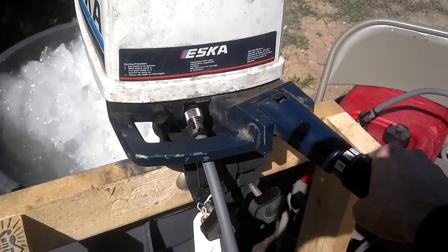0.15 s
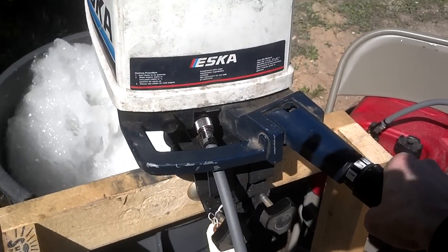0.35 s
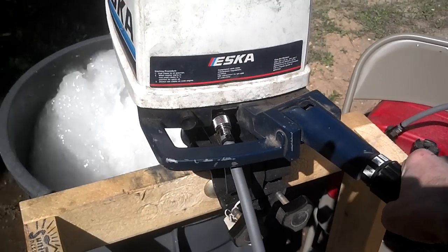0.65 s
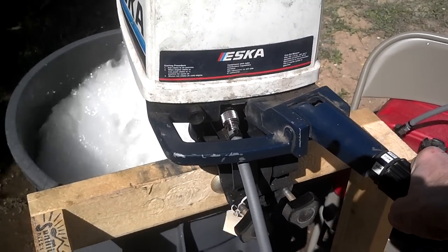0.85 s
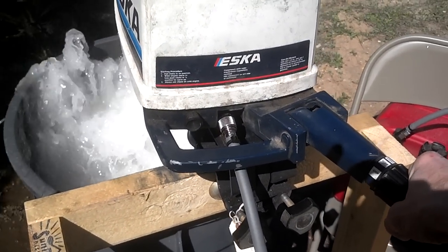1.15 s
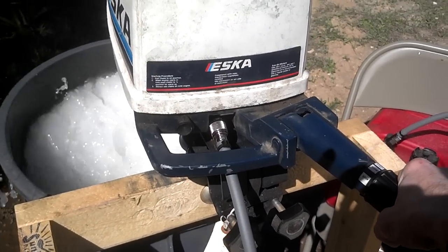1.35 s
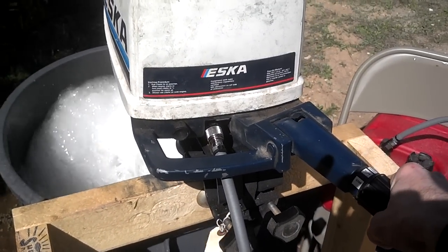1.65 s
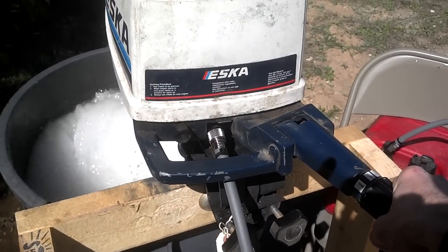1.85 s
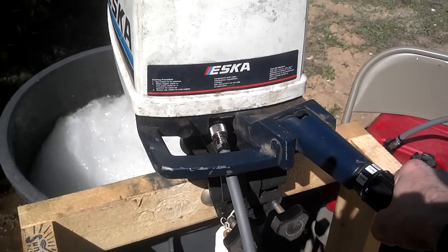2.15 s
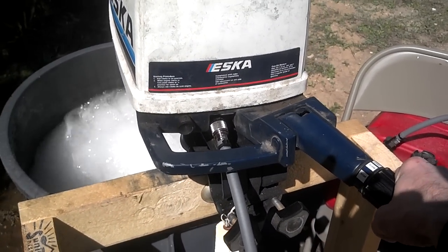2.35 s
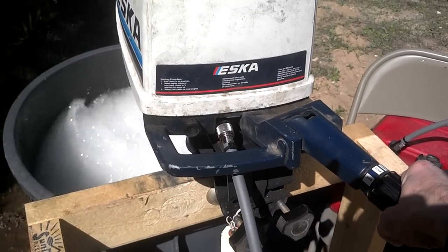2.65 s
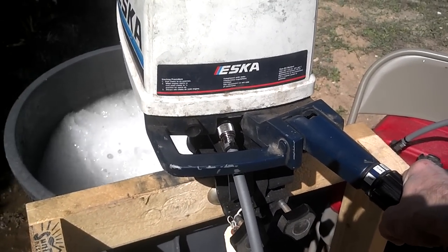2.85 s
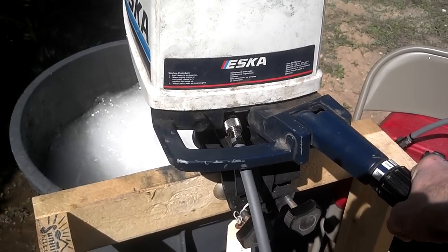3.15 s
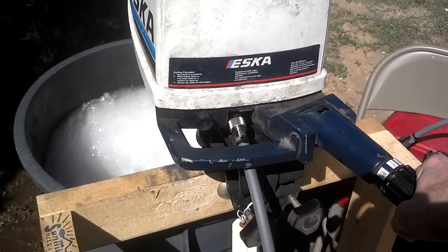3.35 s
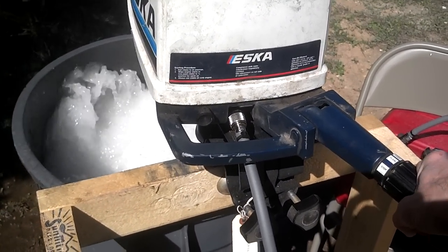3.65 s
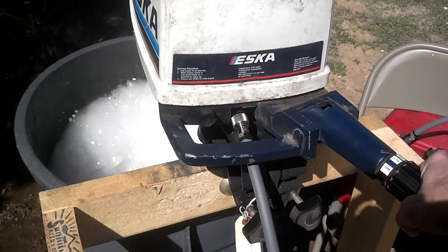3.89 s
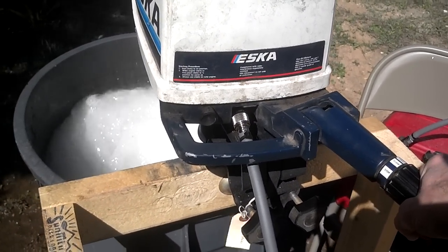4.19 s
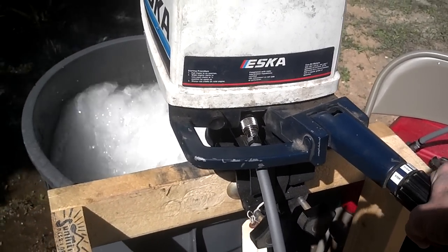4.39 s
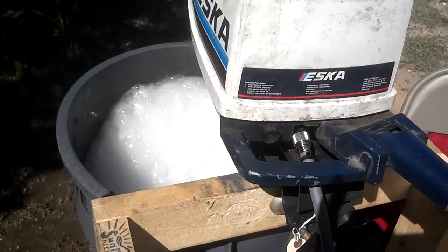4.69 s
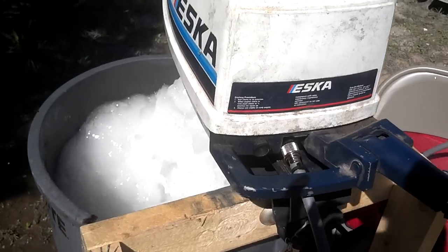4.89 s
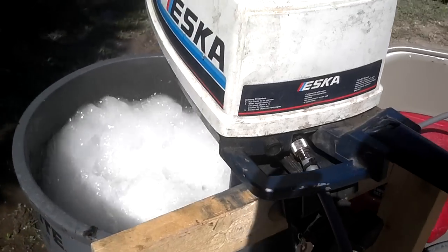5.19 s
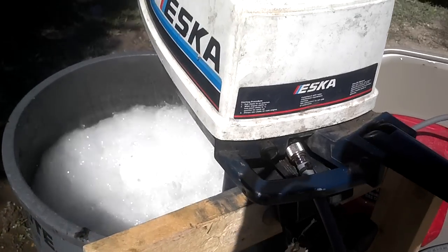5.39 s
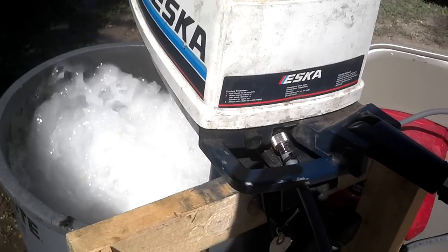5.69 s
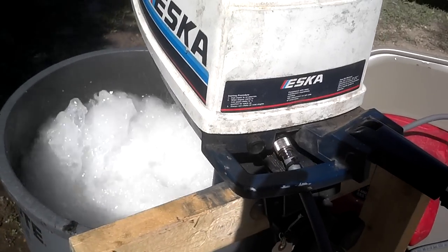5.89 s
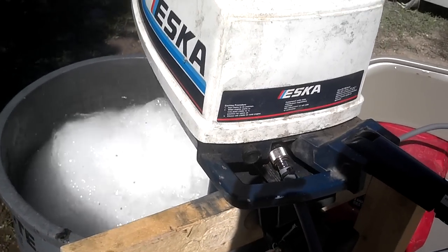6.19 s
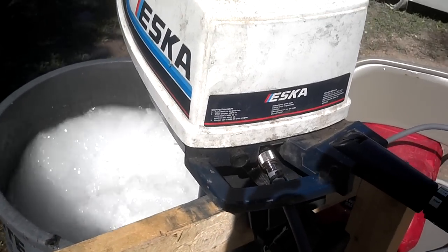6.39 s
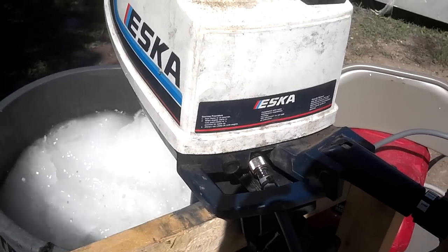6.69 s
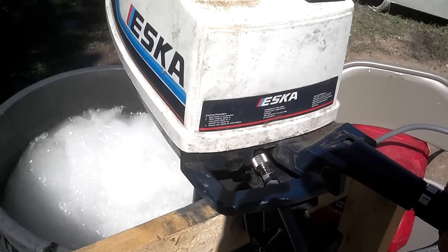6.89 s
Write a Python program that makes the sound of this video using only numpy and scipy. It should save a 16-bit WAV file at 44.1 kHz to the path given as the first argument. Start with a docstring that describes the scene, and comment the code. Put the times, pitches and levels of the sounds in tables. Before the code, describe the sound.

A small one-cylinder two-stroke outboard motor runs on a stand with its propeller in a tub of water. It starts at a fast, clattering idle and slows within two seconds to a steady putter, each firing a hollow knock with a light metallic tick. Water churns underneath throughout, and puffs of exhaust and spray hiss more toward the end. The microphone is close, in wide stereo.

```python
"""The fast idle of a small one-cylinder two-stroke outboard, close by, slowing to a steady putter.
It runs on a stand with its propeller churning a tub of water. Each firing thumps in the leg and cowl,
barks in the intake, ticks, and puffs out gas and spray; the stand hums, the fan whirrs, the fins ring.
A two-port microphone close to the motor hears all this in a wide stereo image."""
import sys
import numpy as np
from scipy import signal
from scipy.fft import rfft, irfft
from scipy.io import wavfile
from scipy.ndimage import uniform_filter1d

SR = 44100
rng = np.random.default_rng(int(sys.argv[2]) if len(sys.argv) > 2 else 0)


def master_out(mix):
    """Clip the mix to full scale and print it as 16-bit PCM to the path in sys.argv[1]."""
    frames = np.transpose(np.atleast_2d(mix))
    ceiling = np.clip(frames, -1, 1)
    pcm = np.round(ceiling * 32767).astype(np.int16)
    wavfile.write(sys.argv[1], SR, pcm)


N = 310464
TIME, FREQS = np.arange(N) / SR, np.fft.rfftfreq(N, 1 / SR)
IDLE_HZ = 38.8  # crank turns per second at the steady putter

# strength of the firings: (time [s], intake bark [dB], leg thump [dB], cowl knock [dB])
FIRING_LEVELS = [(0, -26.5, -33, -39), (.3, -28.5, -28.5, -34), (.62, -26, -32.5, -30.5),
                 (.95, -28, -28.5, -35), (1.12, -29, -29, -37), (1.4, -27.5, -29, -38),
                 (1.54, -36.5, -29, -32.5), (2.19, -27.5, -22.5, -27.5), (2.25, -35.5, -24.5, -31.5),
                 (2.45, -24.5, -21.5, -26), (2.62, -33.5, -25, -31.5), (2.9, -26, -24.5, -29),
                 (3.13, -27, -25.5, -33), (3.2, -33.5, -36, -34), (3.42, -30, -25, -28.5),
                 (4.0, -28.5, -27.5, -30.5), (4.53, -26, -27, -26), (4.82, -25.5, -25.5, -25.5),
                 (4.9, -29, -29.5, -33), (5.44, -25, -25, -34), (5.54, -35.5, -26, -31.5),
                 (5.9, -31.5, -24, -28.5), (6.1, -29, -27.5, -33), (6.44, -28, -27.5, -28.5),
                 (6.6, -29.5, -26, -28.5), (7.04, -31, -25.5, -33.5)]
# the motor's colour; the throttle closes near 1.45 s, the microphone swings to the tub near 4.9 s:
# (time [s], side panel [dB], intake pitch [Hz], tick [dB], upper hiss of the puff [dB])
TIMBRE = [(0, -33, 1120, -48.5, -59), (.5, -40, 1135, -41, -58), (.85, -33, 1150, -44.5, -62),
          (1.02, -35, 1120, -45, -60), (1.17, -41, 1160, -37.5, -62), (1.43, -32, 1114, -40, -59),
          (1.5, -40, 1140, -57, -62), (1.65, -32, 1070, -45, -62), (2.7, -28.5, 1082, -46.5, -48.5),
          (3.6, -25.5, 1097, -44, -51), (4.2, -28.5, 1100, -44, -53), (4.47, -26, 1074, -45.5, -48),
          (4.76, -29, 1107, -48, -46), (4.88, -29.5, 1085, -66, -50), (5.2, -28, 1083, -51, -47),
          (5.5, -30, 1110, -59, -41), (5.9, -24.5, 1150, -52, -42.5), (6.3, -26, 1104, -58, -43),
          (7.04, -28.5, 1065, -57, -48)]
# sounds strongest at speed: (time [s], upper intake tone [dB], low clatter [dB], high clatter [dB])
AT_SPEED = [(0, -39, -29, -31.5), (.35, -35, -34, -39), (.55, -29, -33, -34), (.72, -38, -27, -40),
            (.9, -29, -39, -42), (1.05, -30, -35, -32), (1.15, -32, -37, -25.5), (1.3, -42, -31.5, -36.5),
            (1.5, -35.5, -38.5, -38), (1.8, -52, -58, -62), (2.7, -39.5, -47, -40.5), (4, -50, -40, -48),
            (5.6, -55, -42, -48), (7.04, -63, -55, -48)]


def gain_of(db):
    """Decibels to gain."""
    return 10 ** (np.asarray(db) / 20)


def unit_rms(x):
    """Scales to rms 1."""
    return x / np.sqrt(np.mean(x ** 2) + 1e-20)


def at(rows, seconds, column=1):
    """One column of a time table at the given seconds."""
    return np.interp(seconds, np.transpose(rows)[0], np.transpose(rows)[column])


def fader(rows, column=1):
    """A time table's dB column as a gain at every sample."""
    return gain_of(at(rows, TIME, column))


def at_hz(points, hz=FREQS):
    """Reads a table on a log-frequency axis."""
    f, value = np.transpose(points)
    return np.interp(np.log(hz + 1), np.log(f + 1), value)


def coloured(x, gains):
    """Shapes a signal with one gain per frequency, to rms 1."""
    return unit_rms(irfft(rfft(x) * gains, N))


def noise(spectrum, envelope):
    """Two unrelated noises of one colour under one envelope, at rms 1."""
    return unit_rms(envelope * coloured(rng.standard_normal((2, N)), gain_of(at_hz(spectrum))))


def bump(t, rise_s, fall_s):
    """Envelope that swells and falls exponentially around a rounded top."""
    return 1 / (np.exp(-t / rise_s) + np.exp(np.minimum(t / fall_s, 50)))


def strike(moments, shape, spread_db, jitter_s):
    """Lays shape(seconds since the blow) at every moment, uneven in strength and timing."""
    strength, shift, drift = rng.standard_normal((len(moments), 3, 1)).transpose(1, 0, 2)
    drift = unit_rms(uniform_filter1d(drift, size=5, axis=0))  # slow, over some five firings
    strength = np.clip(strength + .7 * drift, -3, 3)
    samples = np.round(moments * SR).astype(int)[:, None] + np.arange(-500, 3500)
    blows = gain_of(spread_db * strength) * shape(samples / SR - moments[:, None] - jitter_s * shift)
    inside = (samples >= 0) & (samples < N)
    return np.bincount(samples[inside], blows[inside], N)


def ring(moments, modes, spread_db, rise_s=.0003, detune=.007, pitch=1):
    """Each blow rings a set of modes, each with its own strength and a little off pitch."""
    def mode(hz, db, t60):
        hz = hz * pitch * (1 + detune * rng.standard_normal((len(moments), 1)))
        return lambda t: (-gain_of(db - 60 * t / t60) * np.sin(2 * np.pi * hz * t)
                          * (1 - np.exp(-np.maximum(t, 0) / rise_s)))
    return unit_rms(sum(strike(moments, mode(*row), spread_db, jitter_s=.00006) for row in modes))


def gate(moments, rise_s, fall_s, spread_db):
    """An envelope that opens briefly at each moment."""
    return strike(moments, lambda t: bump(t, rise_s, fall_s), spread_db, jitter_s=.0003)


def waver(depth_db=2, smooth_s=.08):
    """A gain that wanders slowly by chance."""
    slow = uniform_filter1d(rng.standard_normal(N), size=round(smooth_s * SR))
    return gain_of(depth_db * unit_rms(uniform_filter1d(slow, size=round(smooth_s * SR / 2))))


def thump(firings, above_idle_hz):
    """The blow-down knocks side panel, cowl and exhaust housing, then thumps the leg."""
    # ringing modes: (frequency [Hz], relative level [dB], t60 [s])
    leg_modes = [(199.4, -7, 0.058), (229.6, -0.5, 0.093), (266.4, -3, 0.087), (282.4, 0.5, 0.1),
                 (356, -14.5, 0.019)]  # leg and tub wall
    cowl_modes = [(426.4, 10, 0.076), (596, 2, 0.045), (708, 1.5, 0.071), (875, -2, 0.06),
                  (1588, 0.5, 0.061), (1850, -14, 0.018)]
    housing_modes = [
        [(541, 7.5, 0.14), (626, 9.5, 0.095)],
        [(734.4, 1, 0.084), (807, -12, 0.13)],
    ]  # a low set and a high set
    panel_modes = [(486.6, 11.5, 0.041), (515.4, -6, 0.087)]
    # the panel's hollow ring moves with the water level: (time [s], pitch [ratio])
    panel_pitch = [(0, 1.016), (4.9, 0.86), (5.05, 1.04), (5.3, 1), (5.37, 0.94), (5.42, 0.87), (5.58, .86),
                   (5.68, 0.94), (5.92, 1), (6.05, 0.94), (6.15, 0.92), (7.04, 0.98)]
    blows = firings - .0001 - .00013 * above_idle_hz  # earlier at speed
    burble = np.interp(firings, TIME, waver())[:, None] ** .06  # the pitch wavers slightly at random
    leg = ring(blows + .0006, leg_modes, spread_db=1.6, rise_s=.0016, detune=.014, pitch=burble)
    cowl = ring(blows, cowl_modes, spread_db=1.5)
    dull, bright = (ring(blows, modes, spread_db=2.5, detune=.016) for modes in housing_modes)
    panel = ring(blows - .0008, panel_modes, spread_db=1.6, pitch=at(panel_pitch, firings)[:, None])
    clatter = fader(AT_SPEED, column=2) * dull + fader(AT_SPEED, column=3) * bright
    knock = fader(FIRING_LEVELS, column=3) * cowl + fader(TIMBRE, column=1) * panel
    return fader(FIRING_LEVELS, column=2) * leg + knock + clatter


def intake_bark(firings):
    """Two intake tones swell for a few cycles, are cut as the port shuts and ring on faintly."""
    def swell(t):
        return bump(t, rise_s=.0017, fall_s=.001) + gain_of(-16.5) * bump(t, rise_s=.0017, fall_s=.0037)

    def tone(peaks, hz):
        hz = hz * (1 + .003 * rng.standard_normal((len(peaks), 1)))
        barks = strike(peaks, lambda t: -swell(t) * np.cos(2 * np.pi * hz * t),
                       spread_db=.9, jitter_s=.00004)
        return unit_rms(barks)
    peaks = firings + .0003
    lower = tone(peaks, hz=at(TIMBRE, firings, column=2)[:, None])
    upper = tone(peaks - .00057, hz=1318)
    return fader(FIRING_LEVELS, column=1) * lower + fader(AT_SPEED, column=1) * upper


def stand_hum(turns, speed_hz):
    """Shaft orders shake the stand, loudest where they cross its resonances."""
    # the stand's response: (frequency [Hz], level [dB])
    response = [(80, -63), (112, -43.5), (150, -64), (190, -42), (222, -32), (250, -49), (285, -36),
                (312, -32.5), (335, -41)]
    # the third, fourth and sixth orders come and go: (time [s], lift [dB])
    third = [(2.4, -5), (3.5, 4)]
    fourth = [(0, 8.5), (.2, 6), (.26, -8), (.32, 10), (.48, 3), (.6, -21), (.8, 10), (.95, 6), (1.05, 9),
              (1.2, 14), (1.3, -23), (7.04, 0)]
    sixth = [(0, -3), (.15, -9), (.24, 6), (.32, -6), (.48, -1), (.55, 5), (.65, 4.5), (.8, 4.5),
             (.88, -0.5), (1.1, 3), (1.6, -22), (3, -11), (4.8, 4.5), (5.6, 7.5), (7.04, -3)]

    def partial(order, trim_db, db_per_hz, lift_db=0):
        db = trim_db + db_per_hz * (speed_hz - IDLE_HZ) + lift_db + at_hz(response, order * speed_hz)
        return gain_of(db) * waver() * np.sqrt(2) * np.sin(2 * np.pi * order * turns)
    return (partial(2, trim_db=-.5, db_per_hz=.33)
            + partial(3, trim_db=-1.5, db_per_hz=.32, lift_db=at(third, TIME))
            + partial(4, trim_db=-9.5, db_per_hz=.53, lift_db=at(fourth, TIME))
            + partial(6, trim_db=-4, db_per_hz=.55, lift_db=at(sixth, TIME)))


def metal_tick(firings):
    """A bright tick at each firing: a short hiss and a hard click of the same colour."""
    # the tick's colour: (frequency [Hz], relative level [dB])
    spectrum = [(2500, -32), (3500, 1), (5000, -1), (6800, 15.5), (7500, 11), (8400, 18), (9500, 6),
                (12000, 5), (13500, -15), (15000, -4)]
    # its timing against the firing: (time [s], lag [s])
    lag = [(0, .0016), (.55, .0017), (.8, .0004), (1.1, -.0002), (1.4, -.0008), (1.7, .0002), (4.1, -.0001),
           (4.6, -.001), (7.04, -.0005)]
    ticks = firings + at(lag, firings)
    hiss = noise(spectrum, gate(ticks, rise_s=.0003, fall_s=.0007, spread_db=1.4))
    clicks = strike(ticks, lambda t: np.exp(-(t / .00002) ** 2), spread_db=1, jitter_s=.0002)
    snap = coloured(clicks, gain_of(at_hz(spectrum)))
    return fader(TIMBRE, column=3) * unit_rms(hiss + .8 * snap)


def piston_slap(firings):
    """The piston slaps just after each firing: a short crack of noise."""
    # the slap's colour: (frequency [Hz], relative level [dB])
    spectrum = [(1100, -30), (1450, 5), (1900, 0.5), (2300, -9.5), (3000, -22), (3700, -6.5), (4500, -26)]
    # its strength: (time [s], level [dB])
    levels = [(0, -53), (.5, -33), (.9, -42), (1.15, -38.5), (1.42, -45), (1.55, -45), (2.8, -42),
              (3.8, -56), (4.6, -52), (5.5, -55), (6.5, -46), (7.04, -48)]
    return fader(levels) * noise(spectrum, gate(firings + .0006, rise_s=.0004, fall_s=.001, spread_db=1.5))


def exhaust_puff(firings):
    """Gas and spray hiss out after each firing, louder when water surges over the exhaust."""
    # the puff's lower and upper hiss, and the spray: (frequency [Hz], relative level [dB])
    puff_spectra = [
        [(4000, -30), (6500, 0), (9000, 6), (10000, -15)],
        [(9000, -2), (10500, 4), (11800, 9), (12800, 5), (13600, -12)],
    ]
    spray_spectrum = [(12500, -32), (14000, -6), (15200, 5), (17000, -4)]
    # lower hiss and spray between surges: (time [s], level [dB])
    lower_levels = [(0, -58), (1.5, -64), (2.7, -54), (4.3, -61), (4.7, -58), (4.9, -49), (5.6, -47.5),
                    (6.5, -48.5), (7.04, -60)]
    spray_levels = [(0, -52), (.8, -55), (1.3, -54), (1.6, -52), (2.5, -50), (3.5, -50), (4.4, -49),
                    (4.9, -47), (5.3, -40), (6, -40), (6.5, -39), (7.04, -44)]
    # water surges: (time [s], lift [dB])
    surges = [(2.11, 10), (2.55, 5), (2.76, 6), (3.9, 5), (4.35, 1), (5.36, 0), (5.62, 2.5), (6.2, 1),
              (6.52, 1), (6.94, 5)]
    lower, upper, spit = (noise(band, gate(firings + .0017, rise_s=.0007, fall_s=.0032, spread_db=3.4))
                          for band in (*puff_spectra, spray_spectrum))
    surge_db = sum(2 * db * bump(np.maximum(TIME - s, -1), rise_s=.013, fall_s=.039) for s, db in surges)
    puff = fader(lower_levels) * lower + fader(TIMBRE, column=4) * upper
    spray = fader(spray_levels) * waver() * spit
    return gain_of(surge_db) * (puff + spray)


def cowl_buzz(throb, above_idle_hz):
    """Cowl and fins buzz with the crank, partly following the bark's level and weaker at speed."""
    # the buzz's colour: (frequency [Hz], relative level [dB])
    spectrum = [(600, -2), (1500, 4.5), (1800, -1), (2050, 5), (2500, -13.5), (3050, -2.5), (3700, -7),
                (4900, -18.5), (5600, -10), (6800, -12.5), (8400, -9.5), (9500, -13), (11500, -19),
                (13300, -16), (15300, -13)]
    bark_lift_db = at(FIRING_LEVELS, TIME, column=1) + 27.5  # above the bark's mean
    return gain_of(-31.5 + .36 * bark_lift_db - .1752 * above_idle_hz) * noise(spectrum, throb)


def fan_whirr(throb, above_idle_hz):
    """The cooling fan whirrs, fading as the crank slows."""
    # the whirr's colour: (frequency [Hz], relative level [dB])
    spectrum = [(1200, -23), (1500, 15), (2000, 27), (2300, -63), (3000, -36)]
    return gain_of(-50 + .92 * above_idle_hz) * noise(spectrum, throb)


def cover_sizzle(throb):
    """A thin cover buzzes high in the treble."""
    # the cover's colour: (frequency [Hz], relative level [dB])
    spectrum = [(5600, -34), (6300, -2), (6800, -1), (7500, -1), (8400, 2.5), (9200, -9), (10000, -34)]
    # its strength: (time [s], level [dB])
    levels = [(0, -49), (1.4, -49), (1.55, -53), (2.5, -48), (4, -46), (4.75, -47), (4.85, -56), (5.5, -44),
              (7.04, -53)]
    return fader(levels) * noise(spectrum, throb)


def fin_ring(firings):
    """The cylinder fins sing as the piston climbs: noise in their narrow resonances."""
    # fin resonances: (frequency [Hz], width [Hz], relative level [dB])
    resonances = [(2990, 220, 5.5), (3696, 42, 2.5), (4800, 38, -30), (6660, 100, -5.5), (8360, 330, -13)]
    # their strength: (time [s], level [dB])
    levels = [(0, -38.5), (.9, -64), (1.15, -45), (1.4, -55), (1.6, -43), (3, -40), (4.5, -44.5),
              (4.75, -38.5), (4.9, -49), (6, -39.5), (7.04, -44)]
    upstroke = .4 + gate(firings + .002, rise_s=.009, fall_s=.002, spread_db=3)
    response = sum(gain_of(db) / (1 + (2 * (FREQS - hz) / width) ** 2) for hz, width, db in resonances)
    return fader(levels) * waver() * unit_rms(upstroke * coloured(rng.standard_normal((2, N)), response))


def water_churn():
    """The propeller tumbles foam in the tub: random short-time spectra with drifting loud patches."""
    # the water's colour: (frequency [Hz], relative level [dB])
    spectrum = [(25, -5.5), (45, 1.5), (65, 2), (120, -17), (220, 10.5), (300, 6), (500, 1), (800, -3.5),
                (1100, -0.5), (1600, -11.5), (3000, -10), (6000, -18.5), (16000, -26)]
    # its strength: (time [s], level [dB])
    levels = [(0, -24.5), (1.25, -28), (1.45, -31.5), (2.5, -27.5), (3.1, -28.5), (5.3, -29.5),
              (5.6, -26.5), (7.04, -31)]
    frames, hz = N // 256 + 5, np.fft.rfftfreq(1024, 1 / SR)
    re1, im1, re2, im2, patches = rng.standard_normal((frames, 513, 5)).T
    patches = unit_rms(uniform_filter1d(uniform_filter1d(patches, size=6, axis=0), size=8, axis=1))
    gains = gain_of(at_hz(spectrum, hz)[:, None] + 2.2 * patches)
    spectra = np.array([re1 + 1j * im1, re2 + 1j * im2]) * gains
    _, foam = signal.istft(spectra, nperseg=1024, noverlap=768)
    return fader(levels) * unit_rms(foam[:, :N])


def diffuse_body(body):
    """The motor's body sound with a slowly wandering phase, widening the stereo image."""
    phase = uniform_filter1d(.03 * np.cumsum(rng.standard_normal(N)), size=400)
    return (signal.hilbert(body) * np.exp(1j * phase)).real


def microphone_ports(direct, scattered):
    """The left port hears the direct sound; the right hears it phase-shifted, plus scattered sound."""
    # likeness of the two ports: (frequency [Hz], coherence [0-1])
    likeness = [(60, 0.75), (120, 0.85), (250, 0.97), (450, 0.94), (1200, 1.0), (1800, 0.61), (2500, 0.97),
                (2900, 0.34), (3600, 1.0), (4250, 0.24), (4900, 0.93), (5500, 0.46), (6700, 0.9),
                (7800, 0.13), (8400, 0.53), (9300, 0.04), (13000, 0.41), (15500, 0.35)]
    # how far the left port leads: (frequency [Hz], phase [rad])
    left_lead = [(60, 2.3), (100, 2), (150, .8), (250, .5), (430, .8), (540, .9), (660, 0), (1600, .2),
                 (2000, 1.6), (2500, 3.15), (3300, 6), (3900, 6.3), (4600, 3.5), (5200, 3.1), (6000, 1.7),
                 (6700, -.1), (7400, -2.5), (7900, -2.9), (8300, .3), (9200, 0), (10500, 3), (12000, 6.7),
                 (13000, 9.5), (14000, 12.5), (15400, 15.8)]
    # balance: (frequency [Hz], left minus right [dB])
    balance = [(60, .5), (120, 2), (250, 3), (500, 4), (800, 2.5), (1200, .5), (2100, 1.5), (4200, -1),
               (5800, -3), (6700, 1), (8000, 10), (11000, 7), (13300, 1), (15500, 7)]
    coherence = np.clip(at_hz(likeness), 0, 1)
    left = rfft(direct)
    shifted = left * np.exp(-1j * at_hz(left_lead))
    right = coherence * shifted + np.sqrt(1 - coherence ** 2) * rfft(scattered)
    tilt = gain_of(at_hz(balance) / 2)
    return irfft(np.array([left * tilt, right / tilt]), N)


def scene():
    """Motor and tub from close by, at the microphone's two ports."""
    # crank speed, one firing a turn: (time [s], speed [turns/s])
    crank_speed = [(0.0, 55.826), (0.48, 54.67), (0.64, 51.483), (0.96, 49.624), (1.28, 46.286),
                   (1.44, 43.099), (1.6, 42.423), (1.76, 39.787), (2.4, 39.172), (2.88, 39.012),
                   (3.04, 39.221), (4.16, 38.827), (4.32, 37.596), (4.96, 36.812), (5.44, 38.288),
                   (5.92, 37.781), (6.24, 36.437), (7.04, 35.394)]
    speed_hz = at(crank_speed, TIME)
    turns = .014 + np.cumsum(speed_hz) / SR
    firings = np.interp(np.arange(np.floor(turns[-1]) + 1), turns, TIME)
    above_idle_hz = at(crank_speed, firings) - IDLE_HZ
    blows = thump(firings, above_idle_hz) + intake_bark(firings)
    radiation = signal.butter(3, 167, "high", fs=SR, output="sos")  # a small casing sends out little bass
    body = signal.sosfilt(radiation, blows) + stand_hum(turns, speed_hz)
    diffuse = diffuse_body(body)
    bursts = metal_tick(firings) + piston_slap(firings) + exhaust_puff(firings)
    throb = 1 + 1.3 * gate(firings - .0012, rise_s=.002, fall_s=.003, spread_db=3)
    above_idle_curve = np.interp(TIME, firings, above_idle_hz)
    whirr_and_buzz = cowl_buzz(throb, above_idle_curve) + fan_whirr(throb, above_idle_curve)
    direct, scattered = bursts + whirr_and_buzz + cover_sizzle(throb) + fin_ring(firings) + water_churn()
    return microphone_ports(direct + body, scattered + diffuse)


def record(dry):
    """The microphone drops the bass below 105 Hz and the treble above 15850 Hz."""
    thin = signal.sosfilt(signal.butter(4, 105, "high", fs=SR, output="sos"), dry)
    band_limit = signal.firwin(1023, 15850, window=("kaiser", 9), fs=SR)
    return signal.oaconvolve(thin, band_limit[None], "same")


dry = scene()
out = record(dry)
master_out(out)
```